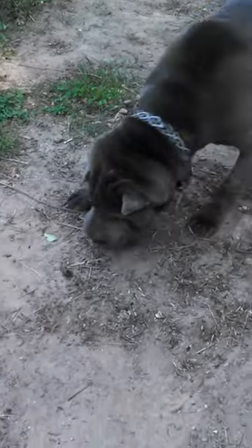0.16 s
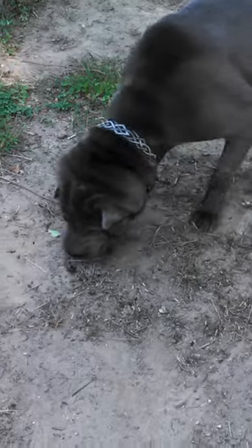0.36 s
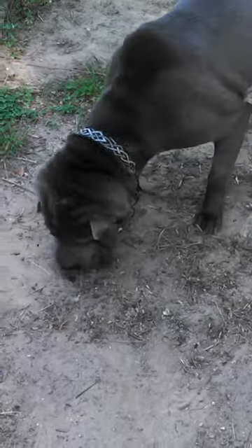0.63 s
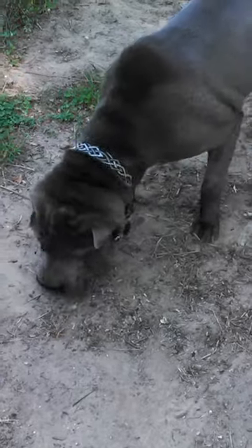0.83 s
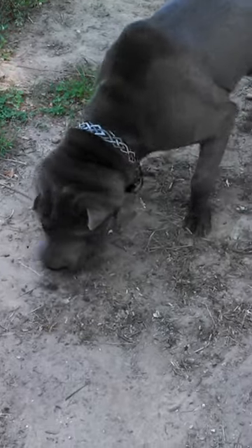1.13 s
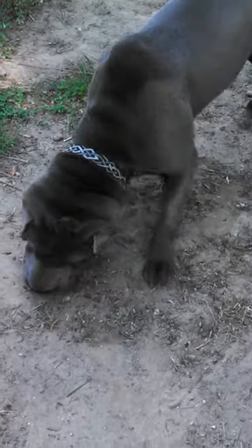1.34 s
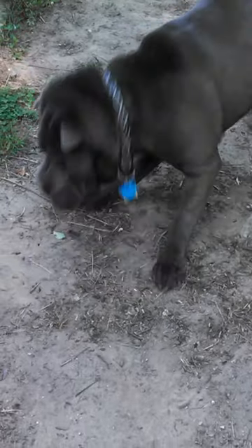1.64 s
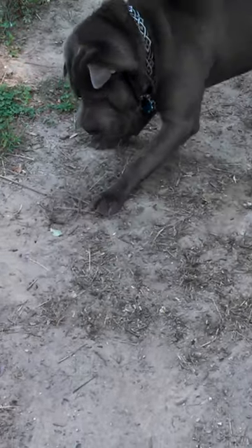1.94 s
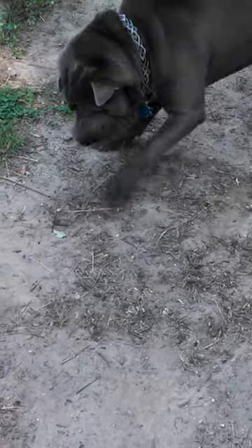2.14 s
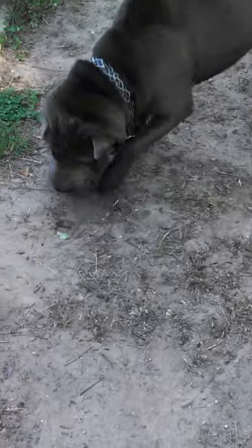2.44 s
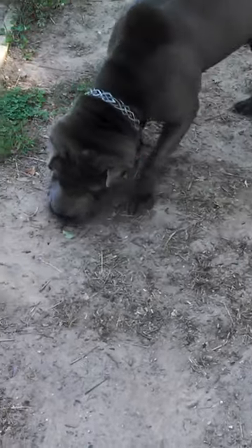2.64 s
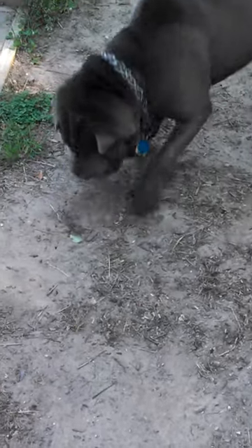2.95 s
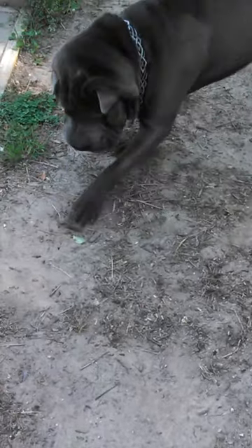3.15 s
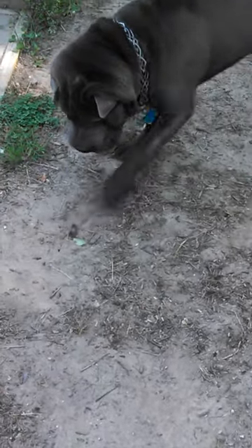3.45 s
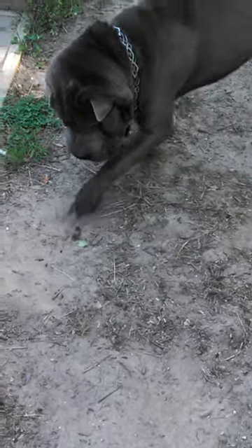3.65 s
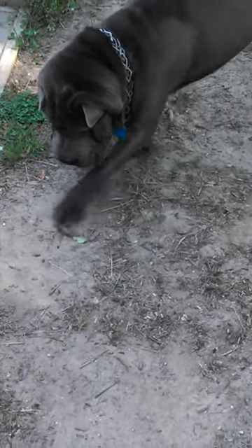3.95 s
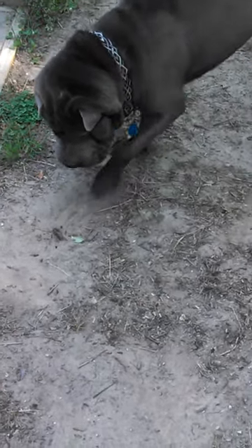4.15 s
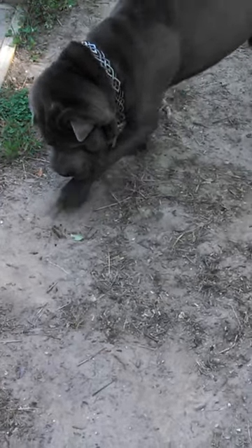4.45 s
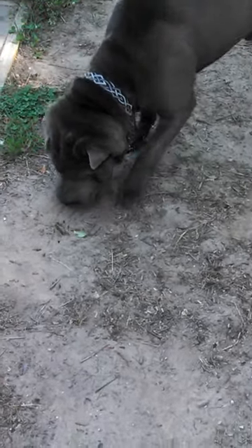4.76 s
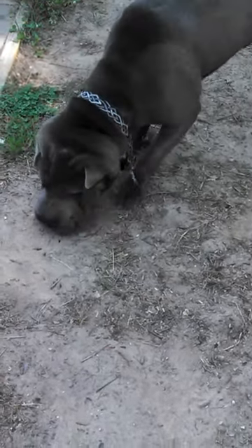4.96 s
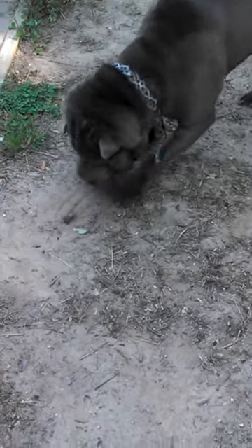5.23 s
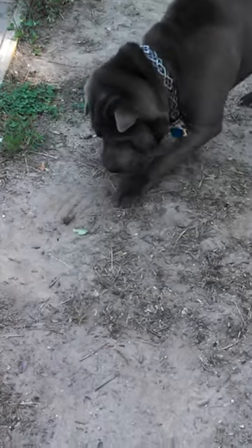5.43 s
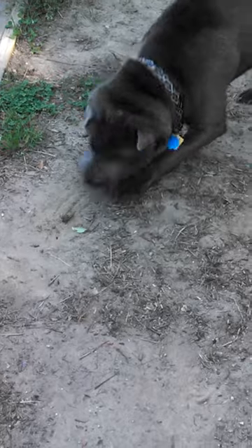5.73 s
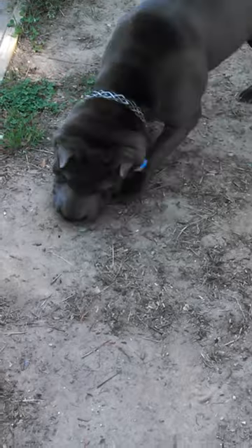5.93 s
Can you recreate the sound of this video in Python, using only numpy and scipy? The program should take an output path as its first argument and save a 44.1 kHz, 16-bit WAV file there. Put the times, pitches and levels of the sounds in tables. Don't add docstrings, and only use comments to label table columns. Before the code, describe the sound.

Outdoors, a low wavering fan hum and distant traffic lie beneath small birds chirping and whistling throughout, one chipping evenly in the first two seconds. Faint dry rustles open the scene. Around 1.0 s comes a short nose puff, then close gritty paw scrapes in sandy dirt with twig snaps and a soft hollow paw knock at 1.25. At 1.45 a blunt finger tap bumps the microphone, followed by bright collar-tag clinks at 1.5-1.6. A very sharp clink at 2.25 makes the background duck and slowly swell back. Lighter scrapes follow, with clinks at 2.9 and 3.65. From 3.8 to 4.5 the strokes are strongest, with crisp twig cracks, then a clink near 4.6. More raspy digging and a longer snuffle come around 5.0-5.3. Tags and twigs click at 5.65, with a hard clink at 5.83, before rustling fades.

```python
import sys
import numpy as np
from scipy import signal
from scipy.fft import rfft, irfft
from scipy.io import wavfile
from scipy.ndimage import uniform_filter1d

SR = 44100
rng = np.random.default_rng(int(sys.argv[2]) if len(sys.argv) > 2 else 0)


def transcribe(u):
    v = np.clip(np.atleast_2d(u).T, -1, 1)
    q = np.round(v * 32767).astype(np.int16)
    wavfile.write(sys.argv[1], SR, q)


def undo_db(level):
    steps = np.asarray(level, float) / 20
    return 10 ** steps


N = 268569
T = np.arange(N) / SR


def band(x, hz, width):
    return signal.lfilter(*signal.iirpeak(hz, hz / width, SR), x)


def unit(x):
    return x / np.sqrt(np.mean(x ** 2))


def resonate(x, modes):
    return unit(sum((-1) ** k * undo_db(db) * band(x, hz, width) for k, (hz, width, db) in enumerate(modes)))


def walk(rate):
    hold = int(SR / rate)
    steps = np.repeat(rng.standard_normal(N // hold + 1), hold)
    return 1.476 * uniform_filter1d(uniform_filter1d(steps, hold), hold)[:N]


def colour(table):
    hz, db = np.transpose(table)
    f = np.fft.rfftfreq(N, 1 / SR) + 1
    density_db = np.interp(np.log(f), np.log(hz), db, left=-120)
    return irfft(rfft(rng.standard_normal(N)) * undo_db(density_db) * np.sqrt(SR / 2), N)


def add(out, s, x):
    i = int(s * SR)
    out[..., i:i + x.shape[-1]] += x[..., :N - i]


def ring(hz, t60, phase=0., size=6000):
    t = T[:size]
    return np.cos(2 * np.pi * hz * t + phase) * np.exp(-np.log(1000) * t / t60)


def ports(x, far_db, lag_count):
    return np.array([x, undo_db(far_db) * np.roll(x, lag_count)])


def town():
    # hz [Hz], density_db [dB per Hz]
    shared_density = [(30, -77), (50, -59.5), (100, -56.5), (200, -62.5), (400, -79), (630, -76),
                      (1000, -87), (1350, -90), (1700, -91.5), (3500, -96.5), (5000, -100.5), (8500, -103),
                      (11000, -101), (15300, -94.5)]
    difference_density = [(30, -103), (60, -72.5), (250, -79.5), (500, -81.5), (1000, -83), (2300, -93),
                          (3500, -100), (5000, -99.5), (6800, -106), (8500, -99.5), (11000, -101),
                          (13500, -94), (15300, -109)]
    # hz [Hz], width_hz [Hz], level_db [dB]
    hum = [(121, 18, -50), (229.5, 4, -47.5), (364, 12, -53), (446.5, 10, -54), (600, 12, -54.5),
           (639, 10, -57), (680, 10, -58), (797, 10, -60), (866, 16, -63), (1100, 45, -61), (1172, 40, -63),
           (1303, 45, -61)]
    blurred = sum(undo_db(db) * unit(band(rng.standard_normal(N), hz, width)) for hz, width, db in hum)
    blade_hz = 331.5 + 1.74 * walk(2.5)
    blade = undo_db(-43.5 + 2.4 * walk(16)) * np.sin(2 * np.pi * np.cumsum(blade_hz) / SR)
    mid = colour(shared_density) * undo_db(0.084 * walk(7.9)) + blurred + blade
    side = colour(difference_density) * undo_db(1.5 * walk(4.9))
    return np.array([mid + side, mid - side])


def chorus():
    out = np.zeros((2, N))
    for hz in 2000 * 2 ** np.arange(0, 1.6, .12):
        patch = undo_db(4 * walk(18))
        out += patch * band(rng.standard_normal((2, N)), hz, .05 * hz)
    return undo_db(-64) * unit(out)


def whistles():
    # time_s [s after the start], pitch_hz [Hz]
    chip = [(0, 2200), (.02, 2170), (.07, 1800)]
    rise = [(0, 1700), (.035, 2300), (.075, 3200)]
    scoop = [(0, 2200), (.035, 2560), (.04, 2300), (.09, 2150), (.125, 2200), (.14, 2380), (.172, 2430)]
    slide = [(0, 3330), (.03, 2950), (.07, 2680), (.12, 2550), (.19, 2500)]
    hook = [(0, 4600), (.03, 4950), (.07, 5000)]
    peep = [(0, 1.006), (1, .994)]
    drop = [(0, 1), (.8, 1.01), (1, .88)]
    # start_s [s], level_db [dB], pitch [factor], length [factor]
    chips = [(0, -51, .93, .8), (.895, -49.5, 1.12, .9), (2.405, -50, 1.14, .8), (3.14, -54, 1.52, .5),
             (5.225, -46, 1.07, .2), (5.44, -45, 1.09, .25)]
    rises = [(.57, -51, 1, 1), (1.1, -50, 1, 1)]
    scoops = [(1.865, -50, 1.04, .65), (2.87, -46, 1, 1), (3.495, -45, 1, 1)]
    slides = [(2.005, -51, .9, .4), (3.215, -52, 1, .95), (3.9, -50, 1, 1)]
    hooks = [(3.785, -52, 1.08, .8), (5.985, -55, 1, 1.2), (5.98, -60, .76, .8)]
    # start_s [s], level_db [dB], pitch_hz [Hz], length_s [s]
    drops = [(3.797, -48, 3180, .045), (6.025, -51, 2540, .065)]
    # start_s [s], length_s [s], pitch_hz [Hz], level_db [dB]
    peeps = [(.18, .1, 2580, -57), (.44, .06, 5720, -60), (.56, .08, 4960, -55), (.77, .08, 4040, -56),
             (.85, .07, 5760, -59), (.87, .11, 5520, -58), (1.77, .1, 2480, -57), (2.47, .25, 2500, -61),
             (2.035, .07, 2230, -50), (3.31, .05, 4280, -58), (3.37, .05, 4000, -57),
             (3.67, .04, 4030, -56), (5.73, .05, 5420, -59), (3.745, .04, 3700, -55),
             (4.52, .08, 2440, -60), (5.59, .07, 4140, -55), (6.04, .05, 5580, -50)]
    # start_s [s], pitch_hz [Hz], level_db [dB]
    steady = (5.39, 2990, -57)

    out = np.zeros(N)
    wobble = walk(120)
    tremble = np.hypot(1 + .2 * walk(150), .2 * walk(150))
    paced = [(.322 + k * .3435, -51.5, 1, 1) for k in range(6)]
    families = [(chip, chips + paced), (rise, rises), (scoop, scoops), (slide, slides), (hook, hooks),
                (drop, drops)]
    calls = [(shape, *row) for shape, rows in families for row in rows]
    calls += [(peep, s, db, hz, length) for s, length, hz, db in peeps]
    for shape, s, db, pitch, stretch in calls:
        time_s, shape_hz = np.transpose(shape) * [[stretch], [pitch]]
        i = int(s * SR)
        t = T[:min(int(time_s[-1] * SR), N - i)]
        part = slice(i, i + len(t))
        hz = uniform_filter1d(np.interp(t, time_s, shape_hz), size=200, mode="nearest")
        hz = hz * (1 + .008 * wobble[part])
        swell = np.clip(np.minimum(t, time_s[-1] - t) / 0.004, 0, 1) * tremble[part]
        add(out, s, undo_db(db) * swell * np.sin(2 * np.pi * np.cumsum(hz) / SR))
    start_s, pitch_hz, level_db = steady
    return out + undo_db(level_db + 3 * walk(30)) * (T > start_s) * np.sin(2 * np.pi * pitch_hz * T)


def churrs():
    chirps = [(0, 0.11, 2080, -58.5), (.17, .04, 5000, -57), (0.42, 0.063, 5600, -58),
              (0.563, .11, 4760, -50), (.77, 0.18, 3960, -60.5), (0.845, 0.14, 5420, -56),
              (1.16, .13, 2980, -55), (2.03, .1, 2350, -59), (3.678, 0.16, 4070, -56),
              (3.69, .1, 4550, -57), (3.86, 0.086, 3200, -58), (2.41, .06, 2300, -53),
              (5.46, 0.11, 2470, -57), (3.786, 0.064, 5090, -50), (3.968, 0.12, 2590, -56),
              (4.232, 0.021, 4180, -59), (5.433, 0.08, 5200, -62), (5.972, 0.13, 4960, -55)]
    out = np.zeros(N)
    rasp = rng.standard_normal(N) * undo_db(1.4 * walk(82))
    for s, length, hz, db in chirps:
        part = rasp[int(s * SR):][:int(length * SR)]
        width = 0.086 * hz
        hoarse = unit(band(band(part, hz, width), hz, width))
        add(out, s, undo_db(db) * signal.windows.tukey(len(part), .4) * hoarse)
    return out


def birds():
    calls = whistles() + churrs()
    yard = rng.standard_normal(9000) * np.exp(-np.log(1000) * T[:9000] / .2)
    wet = signal.fftconvolve(calls, yard / np.sqrt(np.sum(yard ** 2)))[:N]
    return ports(calls, far_db=-8, lag_count=3) + undo_db(-6) * np.array([wet, np.roll(wet, 4)])


def grains(per_s, spread_db, bed_db):
    chance, size, noise = rng.random(N), rng.exponential(size=N), rng.standard_normal(N)
    impact = undo_db(np.minimum(spread_db * size, 16)) * np.sign(noise)
    return unit((chance < per_s / SR) * impact) + undo_db(bed_db) * noise


def dig():
    # start_s [s], end_s [s], grit_db [dB], coarse_db [dB re grit]
    paw_strokes = [(0.092, 0.222, -63.5, 1), (0.28, 0.387, -64, 10), (0.547, 0.742, -72, 17.5),
                   (0.745, 0.84, -57.5, 2), (1.056, 1.107, -42.5, -5.5), (1.112, 1.16, -49, 0.5),
                   (1.163, 1.406, -58, -3.5), (1.416, 1.505, -54, -2), (1.5, 1.586, -47, -5),
                   (1.557, 1.703, -56.5, -3), (2.087, 2.17, -55.5, -5), (2.19, 2.292, -53.5, -9),
                   (2.705, 2.808, -62, -5), (2.872, 2.937, -56.5, -11), (3.03, 3.116, -51, -7),
                   (3.121, 3.277, -54, -1), (3.449, 3.556, -45.5, -3), (3.622, 3.74, -56.5, -2),
                   (3.846, 3.936, -45.5, -2.5), (3.93, 3.995, -45.5, -4.5), (4.03, 4.233, -54.5, -6.5),
                   (4.26, 4.367, -43, -6.5), (4.346, 4.481, -43, -6), (4.83, 4.894, -55, -13),
                   (4.929, 5.018, -50, -7.5), (5.114, 5.218, -41.5, -3.5), (5.52, 5.685, -54.5, -3),
                   (5.7, 5.924, -62, 2.5), (5.93, 6.093, -68.5, 12)]
    # start_s [s], end_s [s], grit_db [dB], grit_hz [Hz]
    snuffs = [
        (0.974, 1.066, -53.5, 6100),
        (5.2, 5.338, -48.5, 7100),
    ]
    # hz [Hz], width_hz [Hz], level_db [dB]
    coarse_modes = [(2300, 1000, -4), (3400, 1200, -1), (4800, 1800, 0)]
    dust_modes = [(12340, 720, 8), (15000, 12600, 6), (15200, 380, -13)]

    flutter = undo_db(2 * walk(40) + 1.5 * walk(150))
    sand = np.array([undo_db(db) * grains(2500, spread_db=3.0, bed_db=4.0) for db in (1.5, -3.5)]) * flutter
    coarse = resonate(sand, coarse_modes)
    dust = resonate(sand, dust_modes)
    strokes = [(a, b, db, coarse_db, -3.5 - max(coarse_db, 0) * 0.39, 8320)
               for a, b, db, coarse_db in paw_strokes]
    strokes += [(a, b, db, -4, -12, hz) for a, b, db, hz in snuffs]
    out = np.zeros((2, N))
    for start, end, db, coarse_db, dust_db, hz in strokes:
        part = slice(int((start - .02) * SR), int((end + .04) * SR))
        onset, release = (T[part] - start) / .03, (end - T[part]) / .05
        swell = np.clip(np.minimum(onset, release) + .5, 0, 1) ** 2
        fine = resonate(sand[:, part], [(hz, 2200, 0), (0.706 * hz, 1400, -3)])
        dirt = fine + undo_db(coarse_db) * coarse[:, part] + undo_db(dust_db) * dust[:, part]
        out[:, part] += undo_db(db) * swell * dirt
    return out


def snaps():
    # start_s [s], peak_db [dB], ring_hz [Hz], t60_s [s]
    twigs = [(0.113, -38, 1710, 0.022), (1.069, -40, 1740, 0.024), (1.131, -33.5, 2280, 0.032),
             (1.254, -51, 1760, 0.013), (1.499, -37, 1670, 0.02), (1.655, -33, 1580, 0.03),
             (1.682, -38.5, 2150, 0.017), (1.968, -45, 1550, 0.02), (2.245, -43, 4000, 0.022),
             (2.879, -38, 2400, 0.019), (2.991, -46, 2280, 0.022), (3.669, -43.5, 3960, 0.02),
             (3.79, -27.5, 2240, 0.031), (3.901, -29.5, 1750, 0.035), (4.29, -27, 3820, 0.0089),
             (4.309, -30, 1570, 0.048), (4.573, -39, 4720, 0.025), (4.612, -33.5, 4430, 0.029),
             (5.229, -35, 2260, 0.027), (5.448, -62.5, 2320, 0.026), (5.603, -36, 4170, 0.021),
             (5.652, -33, 5830, 0.02), (5.711, -36, 3740, 0.018), (5.828, -27, 2320, 0.085),
             (5.805, -44, 8400, 0.048), (6.065, -36, 8900, 0.15), (3.642, -50, 6500, 0.015),
             (2.444, -60, 7040, 0.018)]
    out = np.zeros(N)
    chance = rng.standard_normal((len(twigs), 1500))
    t = T[:1500]
    for (s, db, hz, t60), noise in zip(twigs, chance):
        burst = noise * np.exp(-np.log(1000) * t / t60) * (.7 + np.exp(-t / .001))
        wood = band(burst, hz, 0.16 * hz) + 0.73 * band(burst, 5500, 8200)
        add(out, s, undo_db(db - 0.5) * wood)
    return ports(out, far_db=-7.0, lag_count=5)


def metal_rings():
    # piece [0-1 tags, 2 collar ring, 3 buckle, 4-5 other metal], hz [Hz], level_db [dB]
    metal_modes = [(0, 10300, 0), (1, 11710, 0), (1, 11120, -14), (1, 12170, -8), (2, 14915, 0),
                   (2, 14750, -7), (3, 8650, 0), (3, 9100, -8), (4, 12180, 0), (5, 11120, 0)]
    # start_s [s], level_db [dB], ring_s [s]
    first_tag = [(1.1163, -53, 0.022), (1.4478, -47, 0.003), (1.5149, -44, 0.044), (1.5243, -21.5, 0.006),
                 (1.5317, -33, 0.008), (1.5914, -33, 0.007), (1.6223, -48, 0.012), (1.6559, -54, 0.0064),
                 (1.7328, -57, 0.01), (2.1072, -54, 0.054), (2.115, -45, 0.019), (2.2478, -13, 0.0017),
                 (2.2988, -45, 0.008), (2.3468, -50, 0.007), (2.4443, -56, 0.027), (2.4502, -64, 0.026),
                 (2.4553, -59, 0.015), (2.8786, -51, 0.022), (2.9225, -41, 0.004), (3.0398, -45, 0.006),
                 (3.5174, -53, 0.012), (3.6422, -40, 0.012), (3.6487, -46, 0.011), (3.6698, -34, 0.046),
                 (3.8894, -47, 0.029), (3.9084, -52, 0.01), (4.1808, -40, 0.012), (4.2016, -41, 0.0053),
                 (4.5756, -42, 0.004), (4.6129, -46, 0.0061), (5.1777, -43, 0.007), (5.2918, -45, 0.014),
                 (5.5243, -56, 0.007), (5.6487, -24.5, 0.009), (5.7121, -37, 0.025), (5.8057, -49, 0.018),
                 (5.83, -45, 0.011), (5.836, -45, 0.007), (6.0646, -47, 0.023), (6.0752, -41, 0.013)]
    second_tag = [(0.1144, -50, 0.013), (1.1146, -52, 0.028), (1.429, -46, 0.009), (1.448, -37, 0.003),
                  (1.5152, -47, 0.046), (1.522, -29, 0.011), (1.5791, -42, 0.044), (1.5917, -27, 0.006),
                  (1.6557, -55, 0.008), (1.7329, -52, 0.009), (2.1112, -50, 0.02), (2.1532, -45, 0.01),
                  (2.2341, -40, 0.058), (2.248, -14.5, 0.0045), (2.2556, -29, 0.017), (2.2615, -30, 0.01),
                  (2.273, -42, 0.018), (2.3, -45, 0.008), (2.3495, -48, 0.012), (2.4092, -49, 0.011),
                  (2.4448, -53, 0.025), (2.4554, -54, 0.014), (2.8791, -49, 0.015), (2.9224, -34.5, 0.007),
                  (3.0418, -38, 0.0056), (3.0496, -52, 0.025), (3.0665, -54, 0.008), (3.4918, -52, 0.031),
                  (3.505, -53, 0.019), (3.645, -48, 0.007), (3.669, -28.5, 0.011), (3.715, -43.5, 0.009),
                  (3.9099, -47, 0.007), (4.18, -34, 0.01), (4.2007, -42, 0.006), (4.3444, -43, 0.004),
                  (4.575, -35, 0.0055), (4.6127, -51, 0.011), (5.1759, -40, 0.017), (5.4982, -32.5, 0.0093),
                  (5.5517, -45, 0.013), (5.6034, -44, 0.009), (5.6513, -36, 0.012), (5.8133, -44, 0.034),
                  (5.831, -29, 0.007), (6.0653, -38, 0.008)]
    collar_ring = [(1.0772, -46, 0.013), (1.4479, -27, 0.003), (1.5151, -32, 0.003), (1.522, -38, 0.026),
                   (1.5322, -27, 0.005), (1.5408, -39, 0.008), (1.5555, -44, 0.007), (1.5828, -46, 0.026),
                   (1.5916, -36, 0.009), (1.6562, -52, 0.006), (1.8088, -54, 0.007), (2.1289, -46, 0.009),
                   (2.233, -34, 0.033), (2.2472, -25, 0.017), (2.2714, -46, 0.008), (2.2761, -48, 0.009),
                   (2.2989, -52, 0.009), (2.3483, -48, 0.005), (2.4447, -56, 0.039), (2.4555, -54, 0.025),
                   (2.4722, -57, 0.012), (2.9217, -56, 0.009), (3.0391, -55, 0.015), (3.4748, -45, 0.048),
                   (3.5034, -47, 0.019), (3.6426, -36, 0.0034), (3.671, -32, 0.021), (3.6769, -36, 0.016),
                   (4.1381, -42, 0.025), (4.1815, -37, 0.005), (4.2878, -43, 0.012), (4.5756, -41, 0.006),
                   (5.1381, -49, 0.067), (5.1811, -45, 0.024), (5.6028, -46, 0.007), (5.6468, -36, 0.014),
                   (5.651, -25, 0.007), (5.6648, -46, 0.011), (5.78, -45, 0.007), (5.83, -36, 0.006)]
    buckle = [(1.5241, -33, .006), (1.592, -33, .005), (2.2484, -28.5, .003), (2.262, -42, .008),
              (2.465, -55, .006), (2.897, -46, .006), (3.66, -49, .02), (4.139, -46, .005),
              (4.2, -37, 0.0054), (4.2935, -35, .004), (4.309, -28, .003), (5.649, -32, .008),
              (5.711, -40, .008), (5.801, -44, .02), (6.0653, -35, .012)]
    # piece [index], start_s [s], level_db [dB], ring_s [s]
    free_rings = [(2, 5.711, -37, 0.018), (1, 5.711, -41, .025), (4, 1.533, -37, 0.025),
                  (2, 3.686, -43, .035), (2, 5.812, -45, .016), (4, 3.702, -45, 0.024),
                  (0, 2.2525, -37, .016), (0, 3, -45, 0.044), (0, 2.234, -42, 0.013),
                  (4, 2.3495, -47, 0.028), (5, 2.4555, -46, .014), (4, 1.593, -29, 0.0085),
                  (0, 2.885, -52, .016)]
    piece_db = (0.08, 0.088, 0.1, 0.1, 0.1, 0.1)

    out, t = np.zeros(N), T[:6000]
    rub = np.pad(2 * walk(500), (0, 6000))
    rings = []
    for piece, rows in enumerate((first_tag, second_tag, collar_ring, buckle)):
        for (s, db, ring_s), after in zip(rows, rows[1:] + [(np.inf,)]):
            rings.append((piece, s, db, min(ring_s, .9 * (after[0] - s))))
    rings += free_rings
    chance = rng.random((len(rings), 2, len(metal_modes)))
    for (piece, s, db, ring_s), (angle, spot) in zip(rings, chance):
        fade = (1 - np.exp(-t / .0003)) * np.exp(-1.5 * (t / max(ring_s, .001)) ** 2.4)
        tone = np.zeros(6000)
        for k, (owner, hz, mode_db) in enumerate(metal_modes):
            if owner == piece:
                scatter_db = 3 * (2 * spot[k] - 1) * (mode_db < 0)
                mode_hz = hz * (1 + .004 * (2 * spot[k - 1] - 1))
                tone += undo_db(mode_db + scatter_db) * np.cos(2 * np.pi * (mode_hz * t + angle[k]))
        add(out, s, undo_db(db + piece_db[piece] + rub[int(s * SR):][:6000]) * fade * tone)
    return out


def metal_cracks():
    # start_s [s], crack_db [dB]
    clinks = [(1.4287, -38), (1.5154, -36), (1.5241, -45), (1.5334, -42), (1.553, -44), (1.5918, -35),
              (2.1102, -44), (2.2342, -32), (2.2484, -31), (2.262, -45), (2.2995, -40), (2.347, -50),
              (2.8789, -28.5), (2.9223, -38), (3.04, -44), (3.6424, -44), (3.6697, -28), (3.701, -48),
              (4.1385, -41.5), (4.181, -38), (4.2013, -37), (4.575, -25.5), (5.1744, -42), (5.4982, -42),
              (5.648, -32), (5.655, -31), (5.7108, -39), (5.8303, -21), (6.0656, -44), (6.0746, -41),
              (2.897, -51), (4.2935, -36), (4.3113, -40),
              (1.496, -40), (1.5954, -53), (2.1467, -39), (2.2714, -50), (2.41, -47), (2.4443, -52),
               (2.4562, -51), (4.0422, -42), (4.1203, -56), (4.6122, -45), (5.5504, -43), (5.806, -36)]
    out, t = np.zeros(N), T[:600]
    fall = np.exp(-t / .0007) + .25 * np.exp(-t / .004)
    contacts = clinks
    for (s, crack_db), chance in zip(contacts, rng.random((len(contacts), 600))):
        add(out, s, undo_db(crack_db + 14.5) * band((chance - .5) * fall, 9800, 11300))
    return out


def tags():
    return ports(metal_rings() + metal_cracks(), far_db=-17.5, lag_count=6)


def paw_knock():
    knock = (1.2545, 520, .04, -26)
    out = np.zeros((2, N))
    s, hz, t60, db = knock
    add(out, s, undo_db(db) * ring(hz, t60, -np.pi / 2))
    return out


def finger_tap():
    knocks = [
        (0, 1.44806, 430, .0055, -9, -.7),
        (1, 1.44806, 60, .004, -6.5, 0),
        (0, 1.44885, 500, .0016, -9, 3.14),
        (1, 1.44834, 900, .001, -14, 0),
        (0, 1.4481, 14700, .012, -27, 0),
    ]
    out = np.zeros((2, N))
    for port, s, hz, t60, db, angle in knocks:
        pulse = np.r_[np.zeros(4), ring(hz, t60, angle)]
        add(out[port], s, undo_db(db) * uniform_filter1d(pulse, size=4))
    return out


def gain_control():
    ducks = [
        (1.523, 5.5),
        (1.593, 4),
        (2.248, 12),
        (2.88, -1),
        (3.67, 1.5),
        (4.576, 2.5),
        (5.65, 2),
    ]
    recover_db_per_s = 8.5
    db, last_s, last_db = np.zeros(N), 0, 0
    for s, step_db in ducks:
        last_db = min(last_db + recover_db_per_s * (s - last_s), 0) - step_db
        last_s = s
        after = T >= s
        db[after] = np.minimum(last_db + recover_db_per_s * (T[after] - s), 0)
    return undo_db(uniform_filter1d(db, size=200))


def scene():
    near = dig() + snaps() + tags() + paw_knock() + finger_tap()
    return near + gain_control() * (town() + chorus() + birds())


def top_cut(x):
    return signal.sosfilt(signal.butter(12, 16820, fs=SR, output="sos"), x)


def record(dry):
    cross_feed = .97, 1.03
    lag_count = 16
    late = np.pad(dry[::-1], ((0, 0), (lag_count, 0)))[:, :N]
    wide = dry - np.array(cross_feed)[:, None] * late
    wide = signal.sosfilt(signal.butter(2, 30, "high", fs=SR, output="sos"), wide)
    mix = signal.sosfilt(signal.butter(4, 16000, fs=SR, output="sos"), wide)
    return top_cut(mix)


dry = scene()
out = record(dry)
transcribe(out)
```